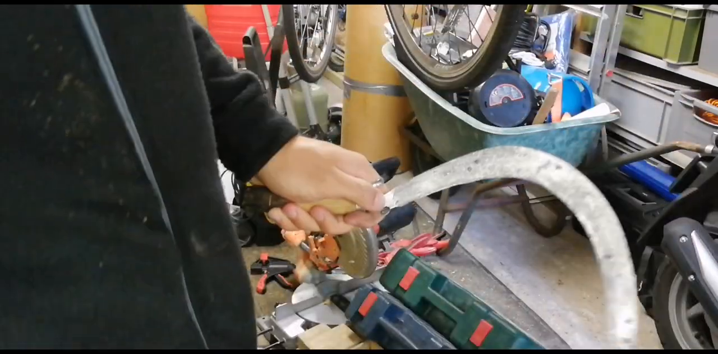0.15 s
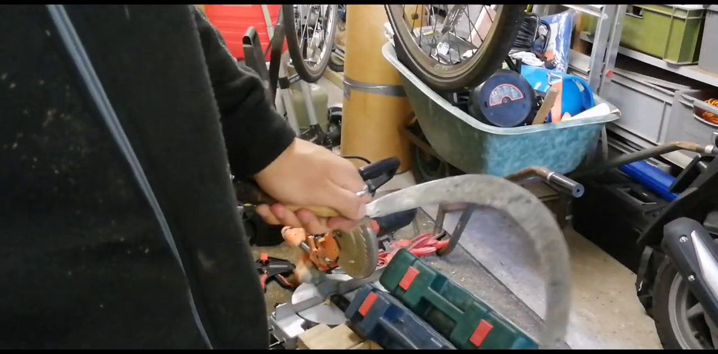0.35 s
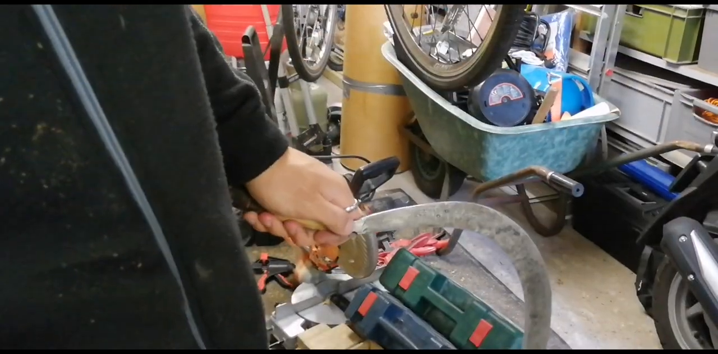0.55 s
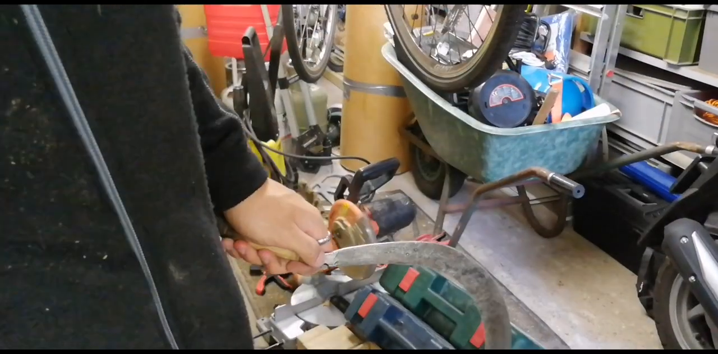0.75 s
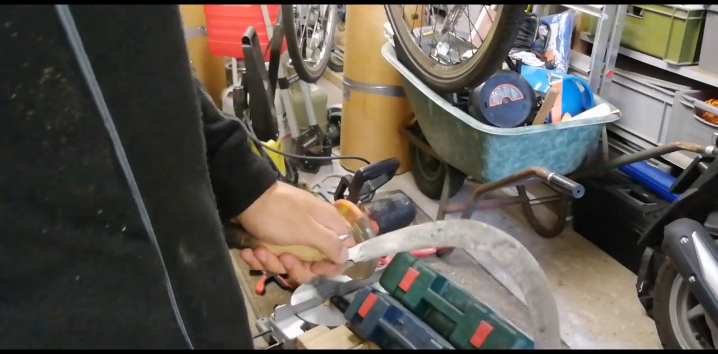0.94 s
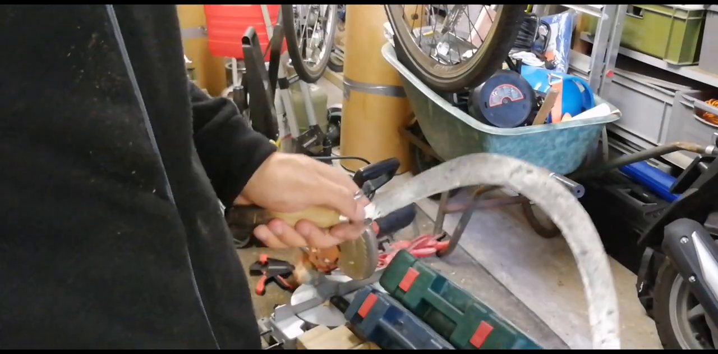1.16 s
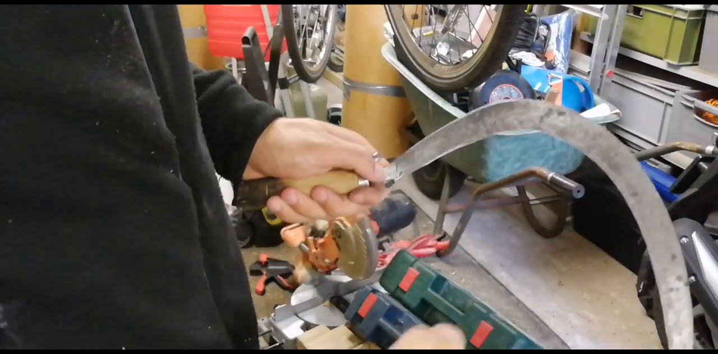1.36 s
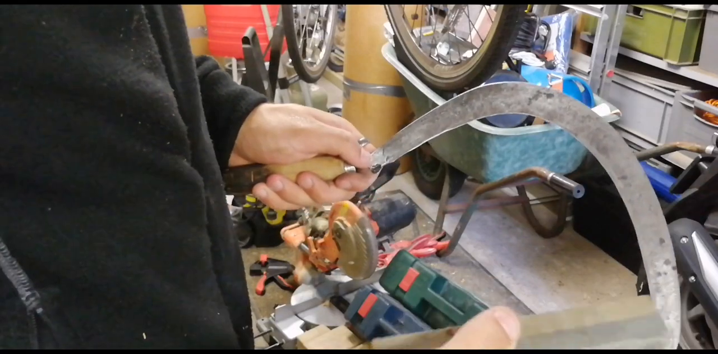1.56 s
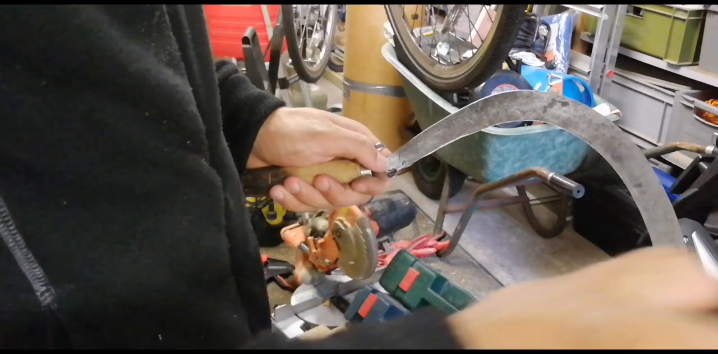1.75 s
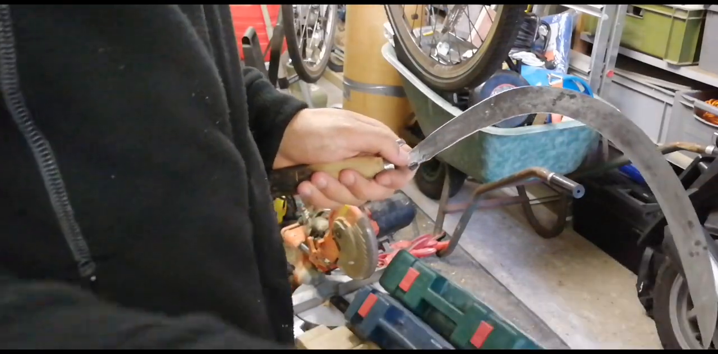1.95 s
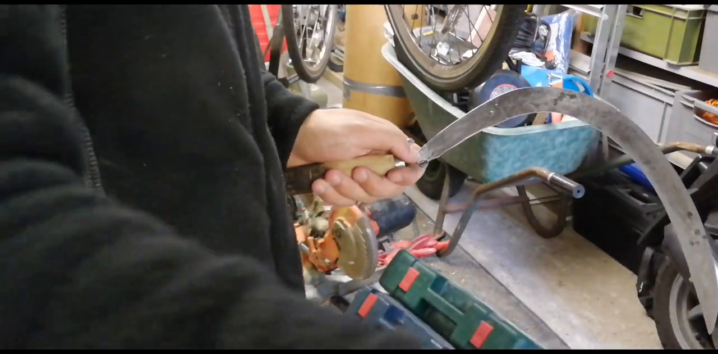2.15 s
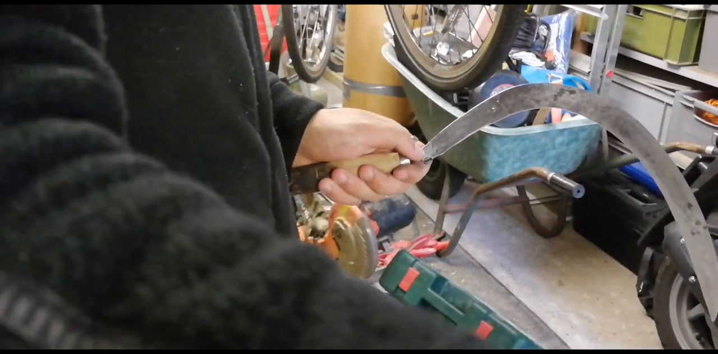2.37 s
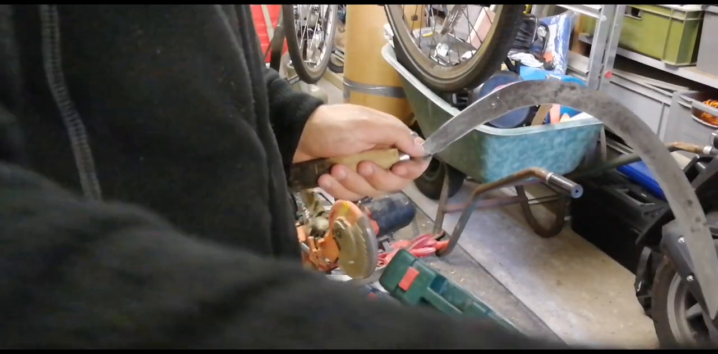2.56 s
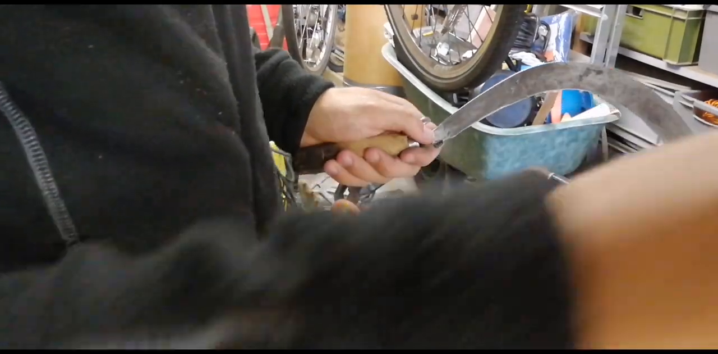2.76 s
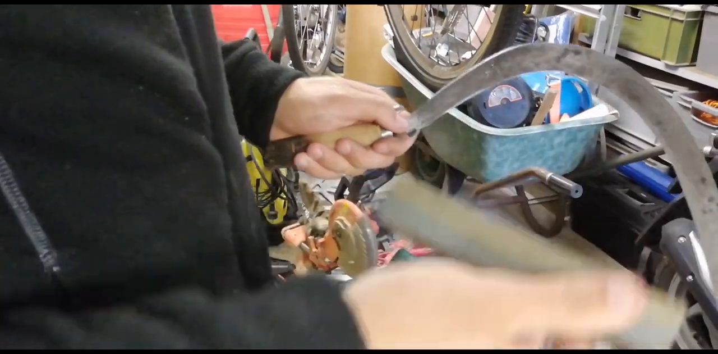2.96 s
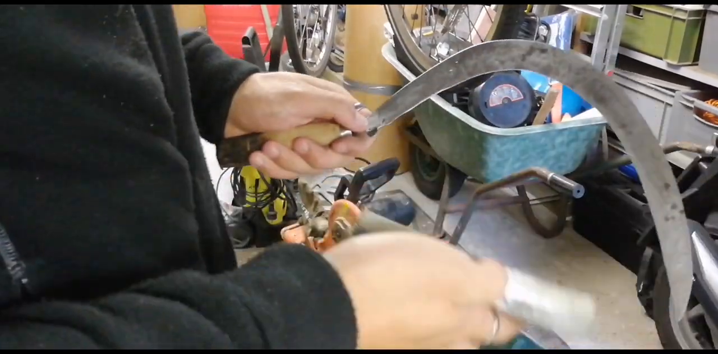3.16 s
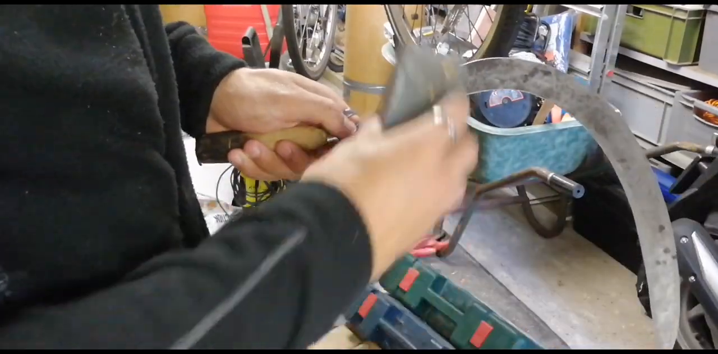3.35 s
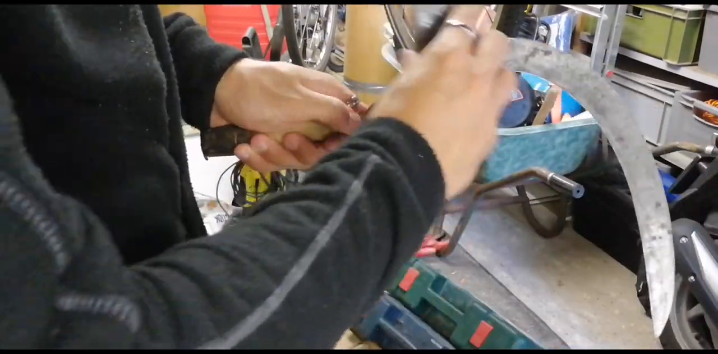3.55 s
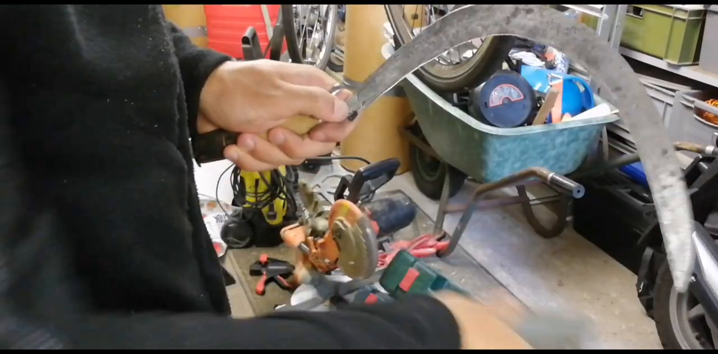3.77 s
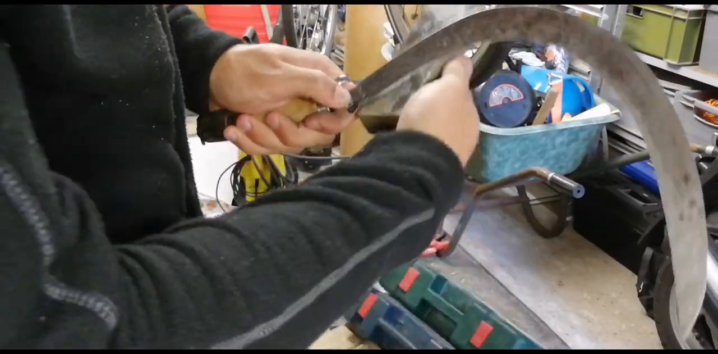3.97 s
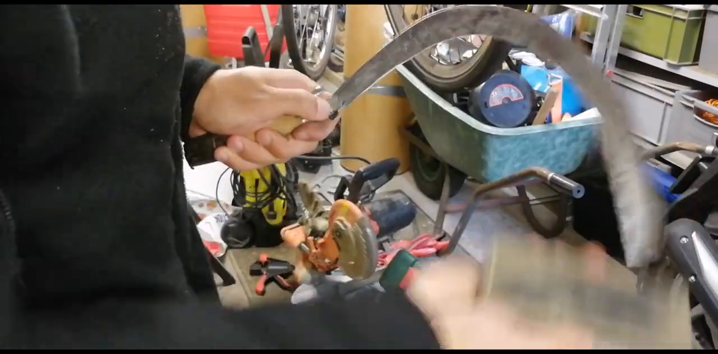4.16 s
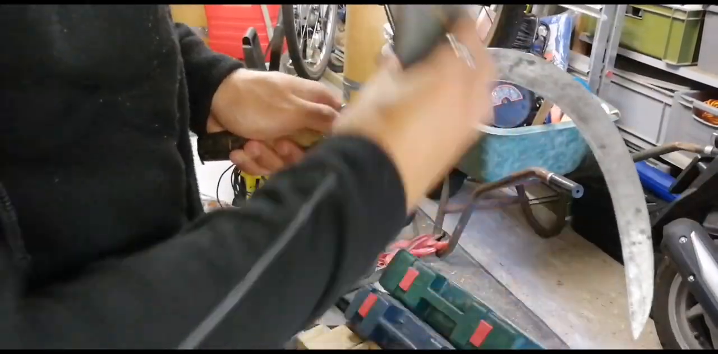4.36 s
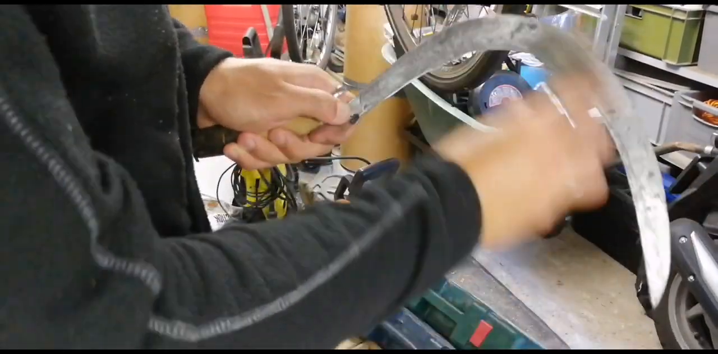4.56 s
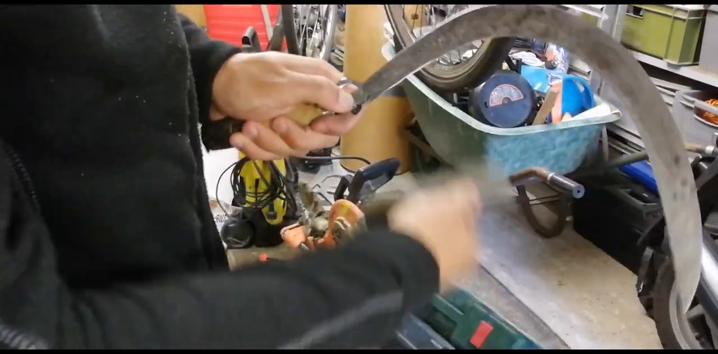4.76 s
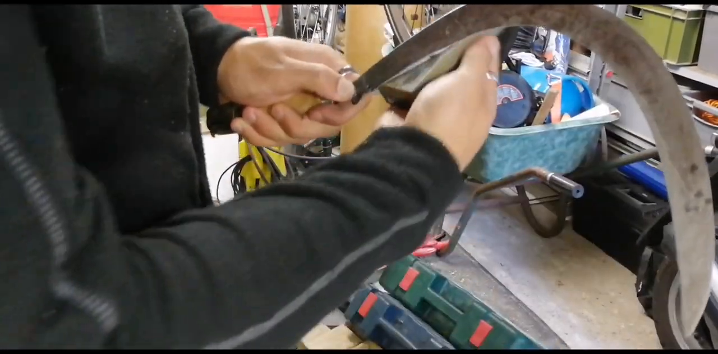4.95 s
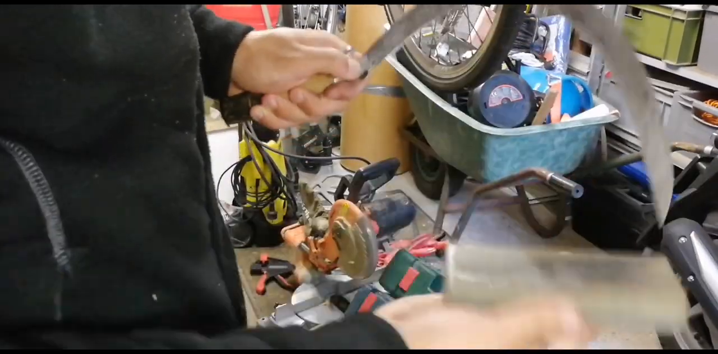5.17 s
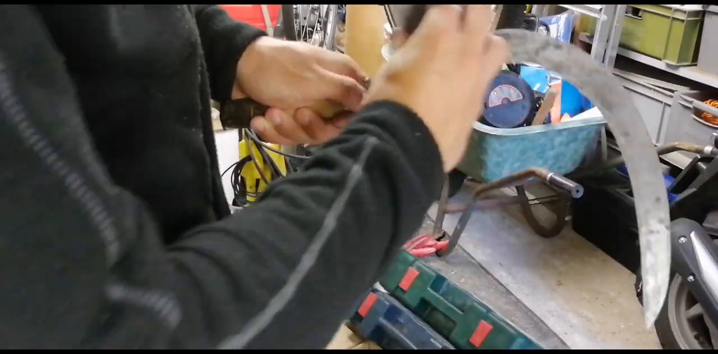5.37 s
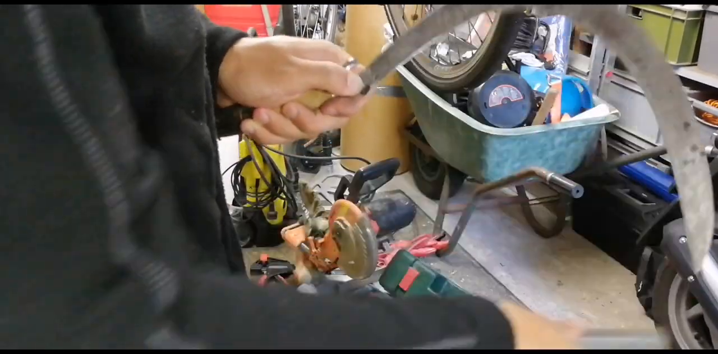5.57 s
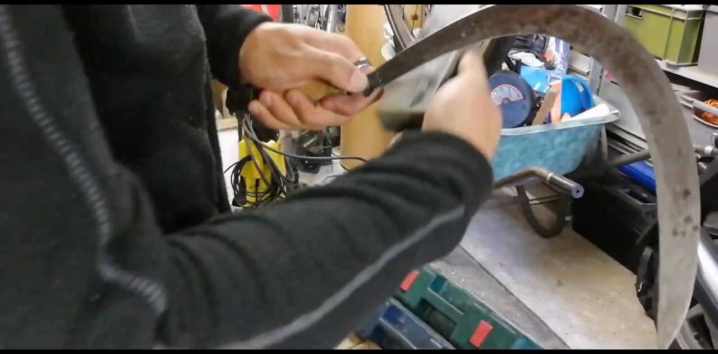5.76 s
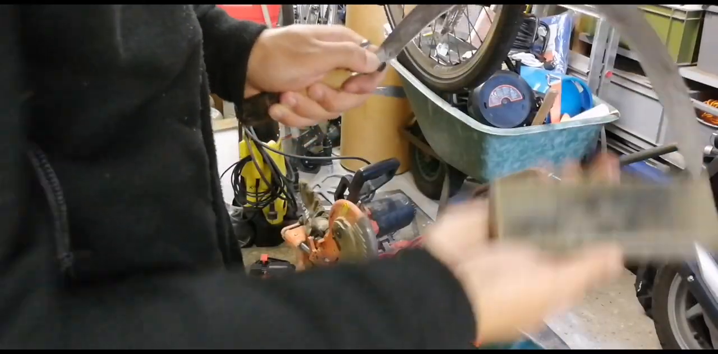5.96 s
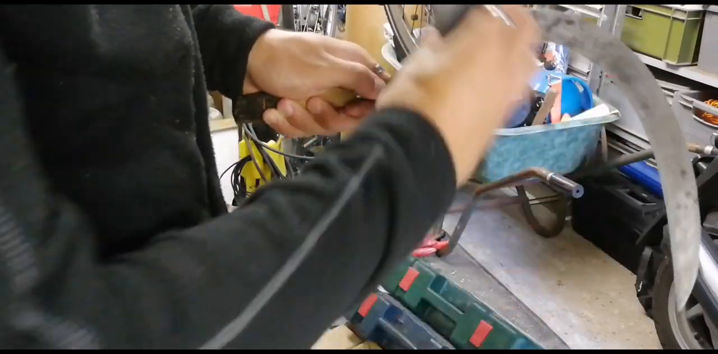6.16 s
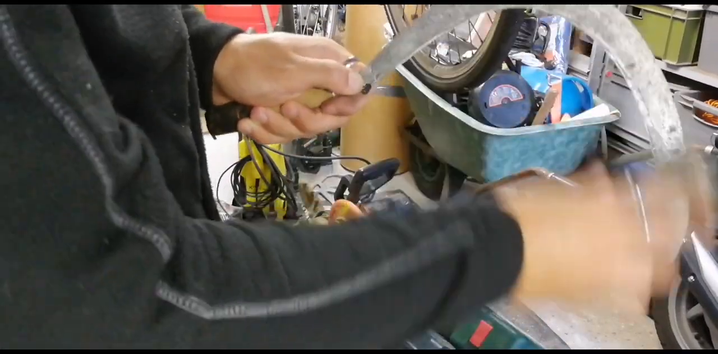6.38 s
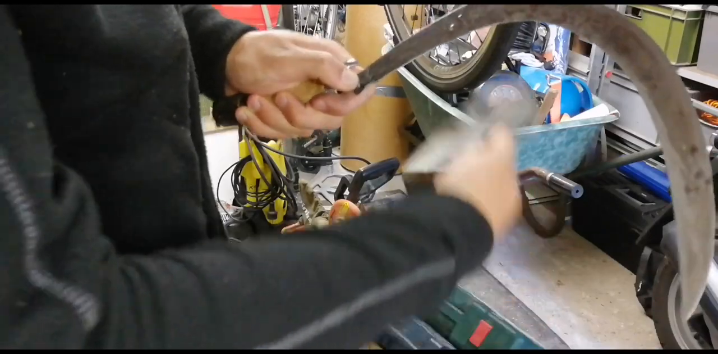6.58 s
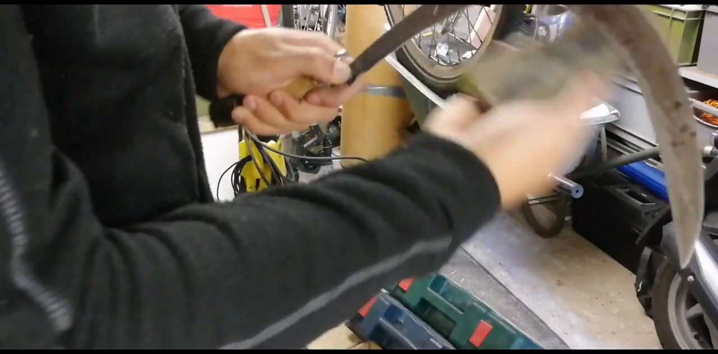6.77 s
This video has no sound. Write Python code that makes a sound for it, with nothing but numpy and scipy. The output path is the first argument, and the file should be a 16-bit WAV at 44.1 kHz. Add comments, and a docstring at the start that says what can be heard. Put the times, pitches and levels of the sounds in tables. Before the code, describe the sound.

Close stereo sound of hand sharpening: dull cloth thuds at the start, a moment of total silence, faint room rumble, then a few hard stone taps on steel. Regular rasping strokes come about twice a second, growling in mid-stroke and hissing towards the tip before a tiny metallic ring. Soft puffs of air from the arm and a faint bird lie behind; the room is dry with a very short tail.

```python
"""A curved steel blade is whetted by hand, close by, in a small, cluttered workshop: grainy noise through steel modes.
A few taps and short scrapes set the stone on the edge, then seven even strokes land with a clack, bite hardest
in the belly of the curve, hiss on towards the tip and leave two bright modes ringing as the stone lifts.
A sleeve bumps the camera with dull noise bursts and low puffs of air, and a far bird sings in wavering sines.
Rumble and airy noise lie beneath; everything falls silent briefly near the start."""
import sys
import numpy as np
from scipy import signal
from scipy.fft import rfft, irfft, next_fast_len
from scipy.io import wavfile
from scipy.ndimage import uniform_filter1d, map_coordinates

SR = 44100
rng = np.random.default_rng(int(sys.argv[2]) if len(sys.argv) > 2 else 0)


def put_to_file(sound):
    """Save the sound as 16-bit audio at rate SR, in the file named by the first command-line argument."""
    columns = np.atleast_2d(sound).T  # one column per channel
    safe = np.clip(columns, -1, 1)
    whole_steps = np.round(safe * 32767)
    wavfile.write(sys.argv[1], SR, whole_steps.astype(np.int16))


N = 300762


def amp(db):
    """Decibels to gain."""
    return 10 ** (np.asarray(db) / 20)


def unit(x):
    """Scale to rms 1."""
    return x / np.sqrt(np.mean(x ** 2) + 1e-20)


def clock():
    """Time of every sample in seconds."""
    return np.arange(N) / SR


def along(points, hz):
    """(Hz, value) points read on a log frequency axis."""
    f, v = np.transpose(points)
    return np.interp(np.log(hz + 1), np.log(f + 1), v)


def curves(rows):
    """One value per sample for each column after the time."""
    s, *cols = np.transpose(rows)
    return [np.interp(clock(), s, c) for c in cols]


def wobble(rate):
    """A smooth random curve, rate knots a second."""
    knots = rng.standard_normal(int(N * rate / SR) + 4)
    return map_coordinates(knots, [np.arange(N) * rate / SR])


def gate(start, end, rise, fall):
    """Opens linearly from start; dies away exponentially after end, with time constant fall."""
    t = clock()
    opening = np.clip((t - start) / rise, 0, 1)
    return opening * np.exp(-np.clip((t - end) / fall, 0, 50))


def swell(s, length):
    """A bell-shaped envelope around time s, down to 1/e at length on either side."""
    return np.exp(-np.minimum(((clock() - s) / length) ** 2, 50))


def filtered(x, response):
    """x times a response of frequency."""
    m = next_fast_len(N + SR // 2)
    return irfft(rfft(x, m) * response(np.fft.rfftfreq(m, 1 / SR)), m)[..., :N]


def resonance(f, hz, width):
    """Causal response of one damped mode."""
    return 1j * f * width / (hz * hz - f * f + 1j * f * width)


def bank(modes, f):
    """Gain of a set of (Hz, width, dB) resonances, added in power."""
    return np.sqrt(sum(np.abs(amp(db) * resonance(f, hz, width)) ** 2 for hz, width, db in modes))


def band(noise, hz, q):
    """Noise sent twice through one broad resonance, rms 1."""
    b, a = signal.iirpeak(np.clip(hz, 100, SR / 4), max(q, .5), SR)
    once = signal.lfilter(b, a, noise)
    return unit(signal.lfilter(b, a, once))


def stereo(pair, colour, alike):
    """Two signals become a coloured, partly alike left and right of rms 1."""
    turn = lambda f: np.arccos(np.clip(along(alike, f), -1, 1)) / 2
    mid, side = filtered(pair, lambda f: colour(f) * np.array([np.cos(turn(f)), np.sin(turn(f))]))
    return unit(np.array([mid + side, mid - side]))


def rush(spectrum, alike):
    """Smooth stereo noise of rms 1."""
    return stereo(rng.standard_normal((2, N)), lambda f: amp(along(spectrum, f)), alike)


# Base level of the background, higher while the body moves: (t/s, level/dB)
WASH_LEVEL = [(0, -63.5), (.7, -69.5), (1.3, -74), (3.3, -75.5), (4.1, -70.5), (6.82, -68)]
# Colour of the low rumble: (f/Hz, density/dB per Hz)
RUMBLE_COLOUR = [(12, -41), (20, -8.5), (43, 5.5), (59, 0), (71, -2), (91, -4.5), (134, -15), (245, -14),
                 (311, -17.5), (400, -30), (520, -68), (880, -120)]
# Colour of the soft air: (f/Hz, density/dB per Hz)
AIR_COLOUR = [(60, -12), (200, 1), (500, -1), (1000, -5.5), (2000, -8), (4000, -14), (8000, -21),
              (12000, -25), (15000, -32)]
RUMBLE_DB = 2.5  # over the base level
# The arm swings back before each stroke and swells the rumble
SWING_DB, SWING_LEAD_S, SWING_S = 4, .05, 0.064


def background(air_db=1):
    """Low rumble that swells with each swing of the arm, and a soft wash of air, both filtered noise."""
    level, = curves(WASH_LEVEL)
    swings = sum(swell(start - SWING_LEAD_S, SWING_S) for start, *_ in STROKE_PLAN)
    low_db = level + RUMBLE_DB + SWING_DB * swings + 2.4 * wobble(5.7)
    low = amp(low_db) * rush(RUMBLE_COLOUR, [(60, 0.83), (250, 0.69)])
    wash_db = level + air_db + 1.35 * wobble(4.2)
    wash = amp(wash_db) * rush(AIR_COLOUR, [(200, 0.34), (1000, 0.08), (5000, 0.3)])
    return (low + wash) * amp([[1.2], [-1.2]])  # leans left


# The sleeve rubs over the camera: (t/s, level/dB, hold/s, brightness/dB on the part above the dull band)
SLEEVE_BUMPS = [(0.069, -51, 0.003, 4.5), (0.104, -40, 0.034, 1), (0.146, -47.5, 0.03, -5),
                (0.162, -35, 0.028, 4.5), (0.198, -43.5, 0.04, -20.5)]
# Colour of the rubbing cloth: (f/Hz, density/dB per Hz)
CLOTH_COLOUR = [(25, -16.5), (60, 1.5), (110, -6), (165, -11), (225, -3.5), (310, -14), (500, -6.5),
                (700, -12.5), (1000, -18), (1500, -21.5), (4000, -40), (12000, -54), (15000, -67.5)]
# Air pushed at the microphone by the arm: (t/s of the centre, level/dB, f/Hz, bell half-width/s)
AIR_PUFFS = [(0.134, -38.5, 60, 0.028), (0.192, -40, 66, 0.027), (2.308, -57.5, 50, 0.027),
             (2.573, -53.5, 48, 0.053), (2.773, -42, 55, 0.023), (2.863, -53.5, 60, 0.013),
             (5.66, -45.5, 58.6, 0.065), (6.759, -40, 57.8, 0.033)]


def sleeve():
    """Cloth drags over the camera in dull noise bursts; puffs of air are low sines with turbulent noise."""
    t = clock()
    rub = rush(CLOTH_COLOUR, [(100, 0.93), (2000, 0.15)])
    dull = filtered(rub, lambda f: 1 / (1 + (f / 320) ** 4))
    bumps = puffs = 0
    for s, db, length, bright_db in SLEEVE_BUMPS:
        cloth = dull + amp(bright_db) * (rub - dull)
        bumps = bumps + amp(db) * gate(s, s + length, rise=0.0023, fall=0.0059) * cloth
    eddies = rush([(25, 17), (70, 9.5), (200, -1), (500, -12), (2000, -65)], [(100, 0.81)])
    for s, db, hz, length in AIR_PUFFS:
        thump = np.sin(2 * np.pi * (hz * t + rng.random()))
        puffs = puffs + amp(db) * swell(s, length) * (thump + 0.61 * eddies)
    return (bumps + puffs) * amp([[1.5], [-1.5]])  # leans left


# Fingers shift their grip: (t/s of the centre, level/dB, bell half-width/s)
GRIP_SHIFTS = [(1.89, -65.5, .024), (2.887, -67, 0.006)]
# Left-right likeness of the blade and hand sounds: (f/Hz, likeness from -1 to 1)
BLADE_LIKENESS = [(60, 0.62), (180, 0.91), (550, 0.57), (1650, 0.25), (4970, -0.056), (15000, 0.0069)]


def grip():
    """Skin brushes softly over handle and stone: bright noise with a fast uneven level."""
    level = sum(amp(db) * swell(s, length) for s, db, length in GRIP_SHIFTS)
    skin = rush([(500, -13), (3000, 3.5), (9000, 0), (15000, -7.0)], BLADE_LIKENESS)
    return level * amp(2.4 * wobble(260)) * skin


# Decay of the room: (f/Hz, t60/s)
ROOM_DECAY = [(200, 0.056), (2000, 0.13), (8000, 0.11), (15000, 0.12)]


def workshop(x):
    """A short diffuse tail from the crowded shelves: decaying noise, unrelated at the two ears."""
    hz, t, z = signal.stft(rng.standard_normal((2, SR // 2)), SR, nperseg=256)
    decay = amp(-60 * t / along(ROOM_DECAY, hz)[:, None])
    tail = signal.istft(z * decay, SR, nperseg=256)[1]
    tail = np.pad(tail, ((0, 0), (SR // 200, 0)))  # 5 ms before the tail begins
    return signal.fftconvolve(x, tail / np.linalg.norm(tail[0]), axes=1)[:, :N]


# Thin whistled notes: (t/s, length/s, first f/Hz, last f/Hz, level/dB), before waver and level flutter
BIRD_NOTES = [(2.031, 0.073, 3854, 3840, -62), (2.143, 0.076, 3830, 3870, -67.5),
              (2.21, 0.069, 7500, 7400, -74), (2.259, 0.082, 7080, 6850, -70),
              (3.136, .05, 4060, 4010, -66), (3.235, 0.072, 3880, 3820, -64),
              (3.336, 0.081, 3780, 3770, -68.5), (3.439, 0.064, 3990, 3800, -71),
              (3.532, 0.071, 3990, 3910, -70), (3.619, .06, 3910, 3820, -66.5),
              (3.91, .15, 3630, 3660, -59.5), (4.06, 0.058, 3750, 3840, -66),
              (5.298, 0.09003, 4100, 3950, -72), (5.42, 0.064, 4040, 4110, -72),
              (6.138, 0.11, 4330, 4630, -70.5)]
NOTE_WAVER, NOTE_ATTACK = 0.013, .12  # shares of the pitch and of the length


def bird(level_db=0, wet_db=-2):
    """Each distant note is a wavering sine on a short glide, heard both directly and by way of the room."""
    song = np.zeros(N)
    waver = 1 + NOTE_WAVER * wobble(240)
    for s, length, first, last, db in BIRD_NOTES:
        note = slice(round(s * SR), round((s + length) * SR))
        u = np.linspace(0, 1, len(song[note]))
        pitch = (first + (last - first) * u) * waver[note]
        envelope = np.minimum(u / NOTE_ATTACK, 1) * np.sqrt(1 - u)
        song[note] += amp(db) * envelope * np.sin(2 * np.pi * np.cumsum(pitch) / SR)
    song = amp(level_db + 3.4 * wobble(70)) * np.array([song, song])
    return song + amp(wet_db) * workshop(song)


def grit(grain_db, patchy_db):
    """Tiny impacts as two grainy noises; the moving contact point favours changing frequency regions."""
    grains = rng.standard_normal((2, N)) * amp(grain_db * wobble(2500))
    z = signal.stft(grains, nperseg=1024)[2]
    field = uniform_filter1d(rng.standard_normal(z.shape[1:]), size=4, axis=0)  # smooth over frequency
    field = uniform_filter1d(field, size=3, axis=1)  # and over time
    return signal.istft(z * amp(patchy_db * unit(field)), nperseg=1024)[1][:, :N]


# Bending resonances of the held blade: (f/Hz, width/Hz, level/dB)
BLADE_MODES = [(560, 41, -12), (1440, 51, -1), (2360, 130, 0), (2760, 150, -2), (3590, 64, 0),
               (4060, 99, -2), (4500, 72, -2), (4910, 120, -2), (5410, 75, -3), (6960, 140, -5),
               (7360, 83, -3), (8430, 120, -1), (8910, 52, -1), (9430, 230, 0), (9890, 110, -3),
               (10500, 46, 0), (11000, 110, 0), (11500, 87, -2), (12100, 130, -6), (13400, 100, -9),
               (14200, 46, -11), (14800, 130, -11)]


def rasp(spectrum, grain_db, patchy_db):
    """Grit heard through the blade, partly direct and partly in its resonances."""
    steel = lambda f: np.hypot(.42, bank(BLADE_MODES, f))
    colour = lambda f: steel(f) * amp(along(spectrum, f))
    return stereo(grit(grain_db, patchy_db), colour, BLADE_LIKENESS)


# The stone is tapped against the blade:
# (t/s, level/dB, treble level/dB, clack f/Hz, clack level/dB, chatter/s as two decay time constants)
STONE_TAPS = [(2.25, -46.5, -16, 1050, 5, 0.0074), (2.499, -26.5, -33, 1940, -4.5, 0.022),
              (2.737, -37, -19.5, 1010, -4, .023), (2.788, -33.5, -10, 910, -1.5, 0.025),
              (2.816, -31.5, 0.5, 1180, -6, 0.0087), (3.305, -58, -1, 2980, 1.5, 0.014)]
TICK_HZ = 7300  # the bright edge of a tap
# Every landing has the same timbre; its level comes from the stroke
LAND_TREBLE_DB, LAND_HZ, LAND_CLACK_DB, LAND_CHATTER_S = -8.5, 1240, -14, 0.028


def touches(noise, knock_db=-8, treble_db=-14, flex_db=-14, tick_db=-1):
    """Taps and landings clack and chatter; returns their hiss, bite and flex strengths, and the clack."""
    landings = [(start, db, LAND_TREBLE_DB, LAND_HZ, LAND_CLACK_DB, LAND_CHATTER_S)
                for start, _, _, db, *_ in STROKE_PLAN]
    force, clack = np.zeros((3, N)), np.zeros((2, N))
    tick = amp(tick_db) * band(noise, TICK_HZ, q=2.2)
    for s, db, bright_db, hz, clack_db, length in list(STONE_TAPS) + landings:
        chatter = amp(db) * gate(s - .001, s, rise=0.0042, fall=max(length, .004) / 2)
        force += chatter * amp([[bright_db + treble_db], [knock_db], [flex_db]])
        knock = amp(clack_db) * band(noise, hz, q=3.1)
        clack += chatter * (knock + amp(bright_db) * tick)
    return force, clack


# Lightly damped modes that sing under the scrape: (f/Hz, level/dB, t60/s)
SINGING_MODES = [(4056, -10, .1), (5400, -11, .1), (5803, -10, .12), (7348, -9, .08), (8345, -6, .1),
                 (8910, -5, .08), (9400, 0, .08), (10455, -2, .08), (10995, -3, .1), (11480, -2, .09),
                 (13390, -12, .1)]


def ringing(scrape, ring_db=-4):
    """Noise that follows the scrape's treble strength, with a slow waver, feeds lightly damped modes."""
    # a 60 dB decay in t60 sets each mode's bandwidth
    modes = lambda f: sum(amp(db) * resonance(f, hz, np.log(1000) / np.pi / t60)
                          for hz, db, t60 in SINGING_MODES)
    treble_power = np.mean(np.diff(scrape, prepend=0) ** 2, axis=0)
    force = np.sqrt(np.abs(uniform_filter1d(treble_power, size=128)))
    drive = force * amp(1.9 * wobble(7.4)) * rng.standard_normal((2, N))
    return amp(ring_db) * filtered(drive, modes)


def pressing(slide_db, press_db, flex_db=-7, flex_growth=0.11):
    """Strength of hiss, bite and flexing: a harder bite bends the blade and brings in its low modes."""
    bend_db = press_db + flex_db + flex_growth * (press_db + 37)
    return amp([slide_db, press_db, bend_db])


# Short scrapes as the stone seeks the edge, and between later strokes:
# (start t/s, end t/s, rise/s, hiss level/dB, bite level/dB)
SHORT_SCRAPES = [(2.527, 2.562, 0.011, -72, -52), (2.616, 2.65, .03, -86, -52),
                 (2.784, 2.824, .005, -53, -47.5), (5, 5.040, 0.0052, -48.5, -46.5),
                 (6.807, 6.83, .004, -40, -35.5)]


def scrapes():
    """Brief slides at an even pressure."""
    return sum(gate(start, end, rise, fall=0.0035) * pressing(hiss, bite)[:, None]
               for start, end, rise, hiss, bite in SHORT_SCRAPES)


# Full strokes: (landing t/s, belly t/s, lift-off t/s, landing level/dB, hiss level/dB, bite level/dB,
# growl f/Hz, lower tip mode level/dB, upper tip mode level/dB)
STROKE_PLAN = [(3.676, 3.793, 3.887, -65, -34, -38, 1560, -45.5, -55),
               (4.112, 4.207, 4.333, -31, -36, -37.5, 1876, -52, -50),
               (4.57, 4.706, 4.832, -32.5, -35, -37, 1400, -50, -67),
               (5.083, 5.156, 5.263, -52, -33.5, -34, 2800, -65, -52),
               (5.496, 5.618, 5.722, -29.5, -35.5, -38, 1840, -55, -46),
               (5.926, 6.033, 6.12, -37, -35, -35, 2180, -49, -50),
               (6.365, 6.473, 6.596, -32, -35, -37.5, 1660, -46, -44)]
# Every stroke swells from landing to belly and eases from there to lift-off (dB, and the power of the curve)
HISS_SWELL_DB, HISS_SWELL_BEND, HISS_EASE_DB = 19.5, 1.26, 2
BITE_SWELL_DB, BITE_SWELL_BEND, BITE_EASE_DB, BITE_EASE_BEND = 17, 0.77, 15.5, 0.79
# At lift-off the level drops quickly; a faint, fast-fading hiss remains for a few hundredths of a second
RELEASE_S, RELEASE_DB, FADE_S, FADE_DB_PER_S = 0.005, 17.5, 0.036, 193
GRIP_WAVER_DB, GRIP_WAVER_RATE = .8, 35  # the hand's pressure is never quite even (knots a second)


def strokes(hiss_db=0, bite_db=-1):
    """Pressure grows up to the belly; then the bite eases while the hiss nearly holds until the lift."""
    t, force = clock(), np.zeros((3, N))
    for start, belly, lift, _, hiss, bite, *_ in STROKE_PLAN:
        before = np.clip((belly - t) / (belly - start), 0, 1)
        after = np.clip((t - belly) / (lift - belly), 0, 1)
        free = np.maximum(t - lift, 0)  # seconds since lift-off
        release = RELEASE_DB * np.minimum(free / RELEASE_S, 1) + FADE_DB_PER_S * free
        slide = hiss + hiss_db - HISS_SWELL_DB * before ** HISS_SWELL_BEND - HISS_EASE_DB * after
        press = bite + bite_db - BITE_SWELL_DB * before ** BITE_SWELL_BEND
        press = press - BITE_EASE_DB * after ** BITE_EASE_BEND
        sounding = gate(start, lift + FADE_S, rise=.0053, fall=0.003)
        force += sounding * pressing(slide - release, press - release)
    return force * amp(GRIP_WAVER_DB * np.array([wobble(GRIP_WAVER_RATE) for _ in force]))


# Two bright modes of the tip, left ringing at lift-off: (f/Hz, t60/s)
TIP_MODES = [(8345, .16), (9400, .11)]


def lifts():
    """The last of each stroke swells two modes, decaying sines that ring on once the edge is free."""
    out = np.zeros((2, N + SR))
    t = np.arange(-SR // 5, SR // 3) / SR  # seconds from lift-off
    for _, _, lift, *_, lower_db, upper_db in STROKE_PLAN:
        first = round((lift + t[0]) * SR)
        for db, (hz, t60) in zip((lower_db, upper_db), TIP_MODES):
            envelope = amp(db - 60 * np.maximum(t / t60, -t / 0.19))
            phase = rng.random((2, 1)) / 3
            out[:, first:first + len(t)] += envelope * np.sin(2 * np.pi * (hz * t + phase))
    return out[:, :N]


# The stone digs in at the belly, and again, lower and softer, just before it lifts (dB over the bite)
GROWL_DB, GROWL_S = -1.5, 0.017
FLICK_DB, FLICK_HZ, FLICK_S, FLICK_LEAD_S = -15.5, 1090, 0.0057, 0.01


def catches(noise):
    """Short growls of band noise where the stone digs in: at the belly and as it flicks off."""
    flick = amp(FLICK_DB) * band(noise, FLICK_HZ, q=1.07)
    out = np.zeros((2, N))
    for _, belly, lift, _, _, bite, hz, *_ in STROKE_PLAN:
        growl = amp(GROWL_DB) * swell(belly, GROWL_S) * band(noise, hz, q=1.45)
        out += amp(bite) * (growl + swell(lift - FLICK_LEAD_S, FLICK_S) * flick)
    return out


# Colour of the sliding hiss, before the blade's resonances: (f/Hz, density/dB per Hz)
HISS_COLOUR = [(1200, -30), (2500, -7), (4500, -3.5), (6500, 0), (8000, -3.5), (9500, -3), (11200, -1),
               (12400, -6), (15000, -11.5)]
# Colour of the cutting bite, before the blade's resonances: (f/Hz, density/dB per Hz)
BITE_COLOUR = [(300, -43), (800, -20), (1200, -4), (2400, 5), (4000, 3.5), (5500, -4.5), (8000, -13.5),
               (15000, -61)]
# Low modes in which the whole blade flexes: (f/Hz, width/Hz, level/dB)
FLEX_MODES = [(387, 33, -9), (531, 18, -2), (580, 22, -4), (721, 26, -3), (1010, 440, -4), (1138, 64, -0.5),
              (1428, 40, 4), (1830, 92, 2)]


def whetting(judder_db=1.32):
    """Grit on steel, shaken by the uneven grip of the stone: hiss, bite, flexing, growls and clacks."""
    noise = stereo(grit(grain_db=3, patchy_db=3), np.ones_like, BLADE_LIKENESS)
    landing, clack = touches(noise)
    hiss, bite, flex = strokes() + scrapes() + landing
    judder = judder_db * wobble(110)
    sliding = rasp(HISS_COLOUR, grain_db=2.5, patchy_db=4.2)
    cutting = rasp(BITE_COLOUR, grain_db=3, patchy_db=5)
    low_steel = lambda f: bank(FLEX_MODES, f) * f / (f + 500) / (1 + (f / 2200) ** 4)
    bending = stereo(grit(grain_db=1.5, patchy_db=3), low_steel, BLADE_LIKENESS)
    gnawing = bite * cutting + flex * bending + catches(noise)
    return hiss * amp(0.61 * judder) * sliding + amp(judder) * gnawing + clack


# Stereo lean of the blade and hand sounds: (f/Hz, left minus right level/dB)
BLADE_LEAN = [(400, 0), (1000, 2.5), (1500, 0.5), (2400, 1), (4500, 3.5), (7000, 4), (8500, 3.5),
              (9400, 7.5), (10100, -5), (11000, -4), (12000, -8.5), (13500, -0.5)]


def scene(room_db=-15):
    """The blade close by, coloured differently at each microphone port, in the room with all the rest."""
    scrape = whetting()
    close = scrape + ringing(scrape) + lifts() + grip()
    blade = filtered(close, lambda f: amp(np.outer([.5, -.5], along(BLADE_LEAN, f))))
    return blade + amp(room_db) * workshop(blade) + sleeve() + bird() + background()


# The brief silence: (start t/s, end t/s)
SILENCE = (.722, .926)
TOP_HZ = 15350  # band limit


def record(dry):
    """The sound drops out for a fifth of a second; nothing passes above the band limit."""
    silent = (clock() > SILENCE[0]) & (clock() < SILENCE[1])
    live = uniform_filter1d(1.0 - silent, size=128)  # softens both edges
    return filtered(dry * live, lambda f: f < TOP_HZ)


dry = scene()
out = record(dry)
put_to_file(out)
```